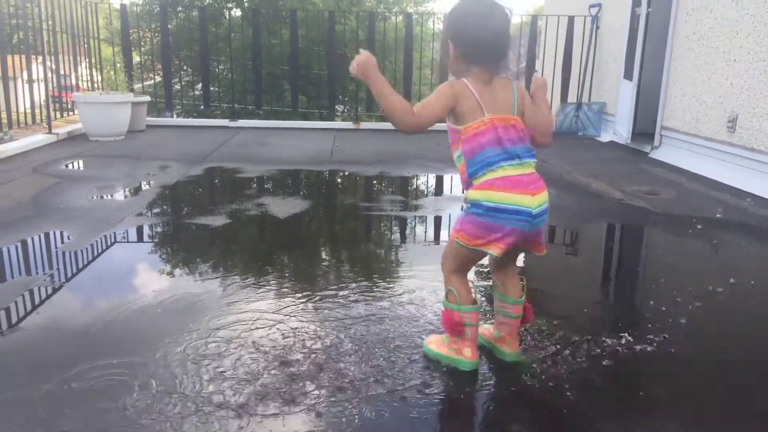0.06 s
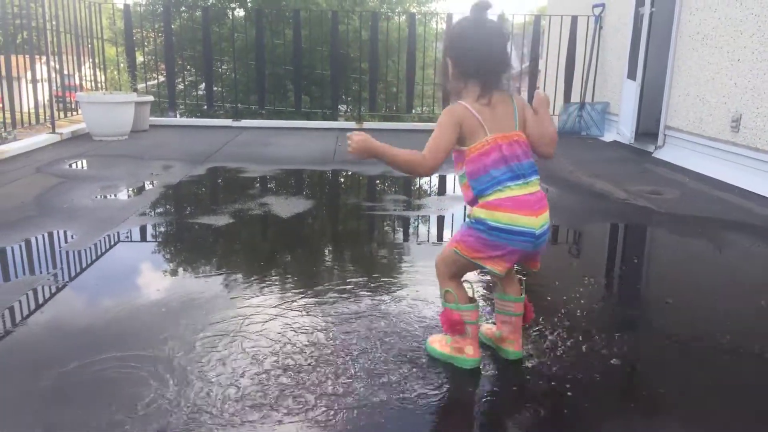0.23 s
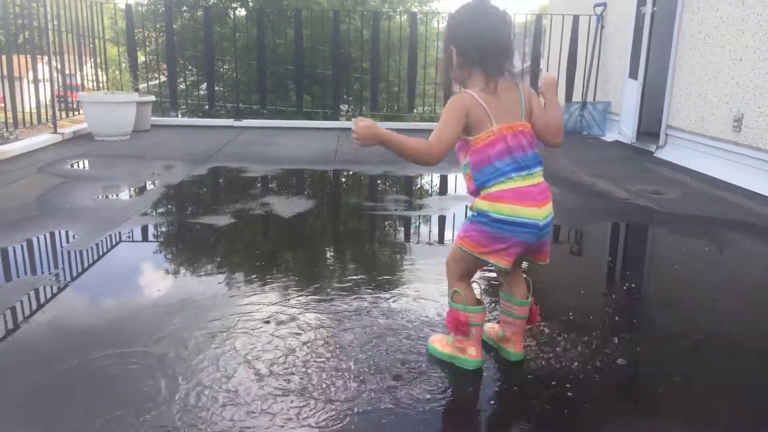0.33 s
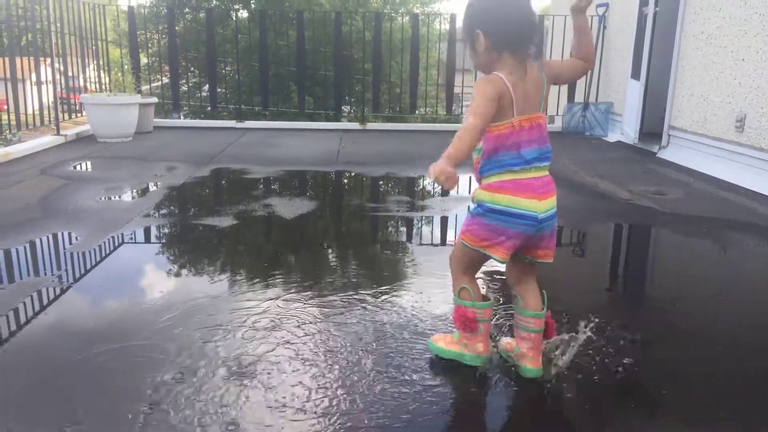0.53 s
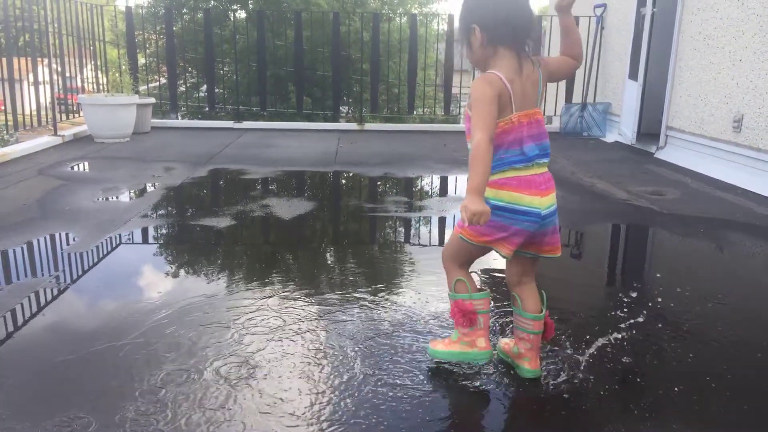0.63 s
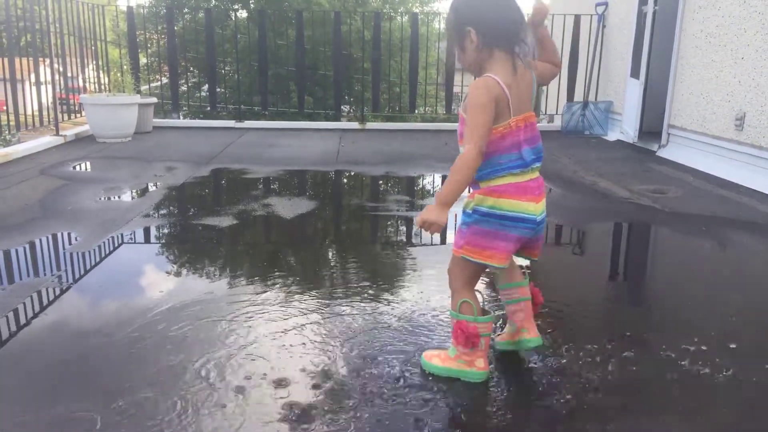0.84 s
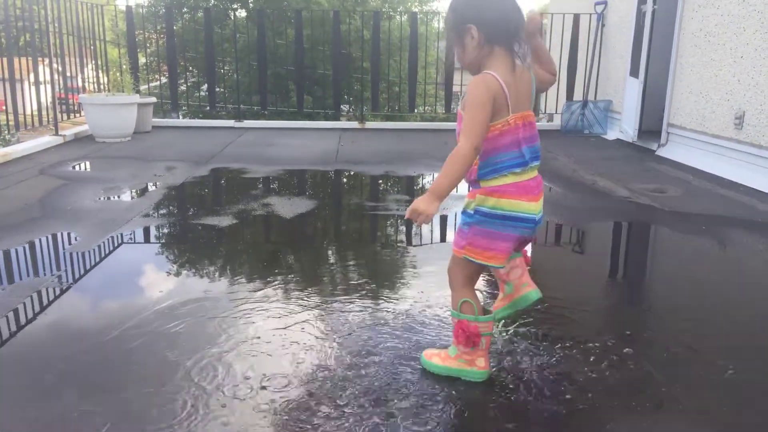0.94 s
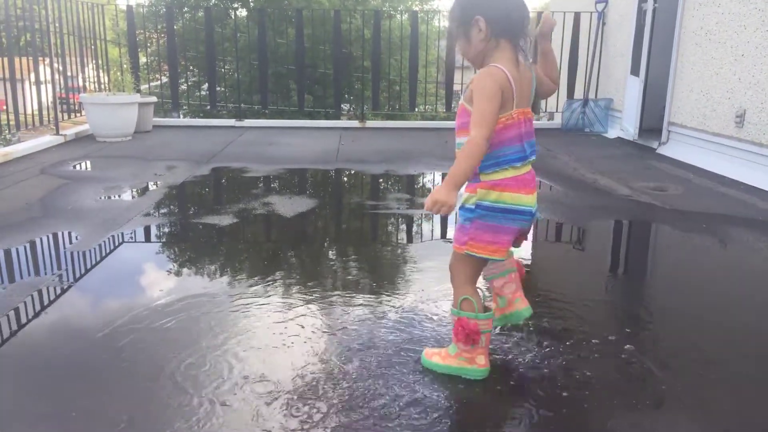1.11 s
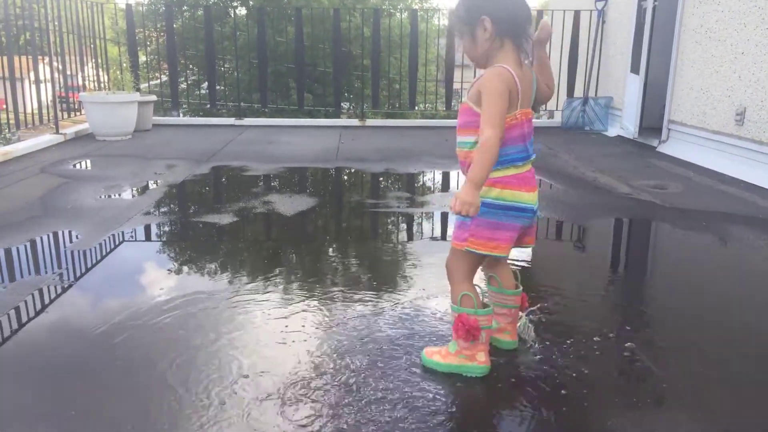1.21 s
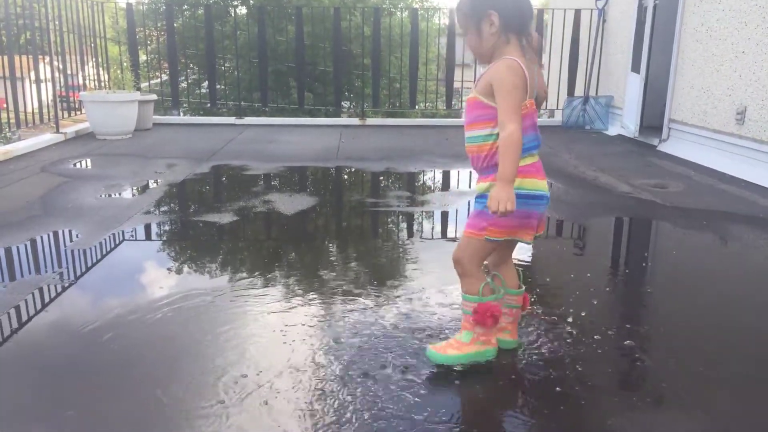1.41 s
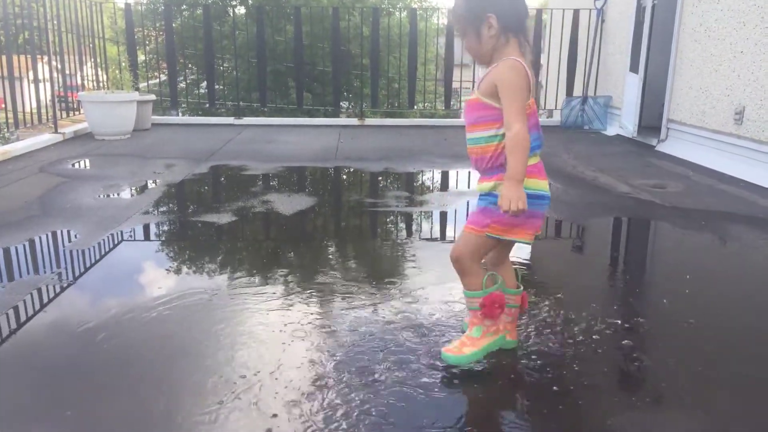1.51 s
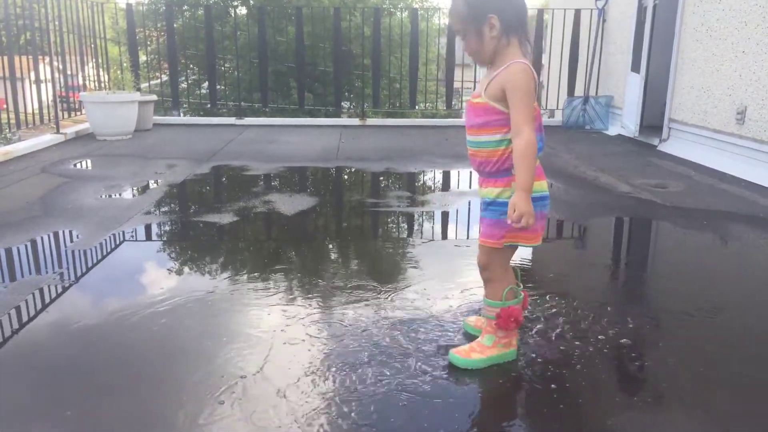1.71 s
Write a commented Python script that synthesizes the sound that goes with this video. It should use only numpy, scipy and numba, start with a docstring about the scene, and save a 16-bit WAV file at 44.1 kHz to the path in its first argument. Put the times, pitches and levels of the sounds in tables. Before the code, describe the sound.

Four puddle splashes from a child stamping in rubber boots, the first heavy and the next three softer. Each is a crisp wet slap with bubbles and falling droplets, mostly with a dull thud, over a faint outdoor rumble.

```python
"""On a roof terrace, a child in rubber boots stamps four times in a shallow puddle.
Each sole bursts the water film with a crack and squeezes out a cloud of tiny ringing bubbles;
spray hisses down after it and a house wall returns a weak echo. The heel lands with a hollow thud
and the deck booms in its low modes, over a faint outdoor rumble.
An automatic gain control lowers the level after a loud stamp."""
import sys
import numpy as np
from scipy import signal
from scipy.fft import rfft, irfft, next_fast_len
from scipy.io import wavfile
from scipy.ndimage import uniform_filter1d
from numba import njit

SR = 44100
rng = np.random.default_rng(int(sys.argv[2]) if len(sys.argv) > 2 else 0)


def pcm_store(signal):
    """Save signal as 16-bit PCM."""
    levels = np.round(np.clip(np.atleast_2d(signal), -1, 1) * 32767)
    wavfile.write(sys.argv[1], SR, levels.astype(np.int16).T)


N = 77175
T = np.arange(N) / SR
LN_1000 = np.log(1000)  # exponent of a 60 dB decay


def undb(db):
    """Amplitude ratio of a level in decibels."""
    return 10 ** (np.asarray(db) / 20)


def unit(x):
    """Normalisation to rms 1."""
    return x / np.sqrt(np.mean(x ** 2) + 1e-20)


def cut(x, hz, kind, order):
    """Maximally flat low-pass or high-pass filter."""
    return signal.sosfilt(signal.butter(order, hz, kind, fs=SR, output="sos"), x)


def colour(x, points):
    """Minimum-phase filter through (frequency [Hz], level [dB]) points; the result has rms 1."""
    hz, db = np.array(points, float).T
    size = 2 * next_fast_len(N)
    bin_hz = np.maximum(np.arange(size // 2 + 1) * SR / size, 1)
    gain = undb(np.interp(np.log(bin_hz), np.log(hz), db))
    cepstrum = irfft(np.log(gain))
    cepstrum[1:size // 2] *= 2  # folding onto positive time makes the filter causal
    cepstrum[size // 2 + 1:] = 0
    return unit(irfft(rfft(x, size) * np.exp(rfft(cepstrum)))[:N])


def swell(at, rise_s, fall_s):
    """Transient envelope: a bell-shaped rise to a peak of 1, then exponential decay."""
    envelope = np.zeros(N)
    span = slice(*np.searchsorted(T, [at - 4 * rise_s, at + 10 * fall_s]))
    t = T[span] - at
    envelope[span] = np.exp(np.where(t < 0, -(t / rise_s) ** 2, -t / fall_s))
    return envelope


def resonate(x, modes):
    """Forced response of damped modes; broadband input keeps its level."""
    t = T[:4096]
    ring = sum(undb(db) * width * np.exp(-np.pi * width * t) * np.cos(2 * np.pi * hz * t)
               for hz, width, db in modes)
    return signal.fftconvolve(x, ring / np.sqrt(np.sum(ring ** 2)))[:N]


def bubbles(times, amplitudes, hz, cycles, rise_cycles=.71, glide=.05):
    """Bubble resonance: each starts softly and decays 60 dB over `cycles` as its pitch glides up."""
    steps = np.arange(int(cycles / hz.min() * SR))
    periods = hz[:, None] * steps / SR
    envelope = (1 - np.exp(-periods / rise_cycles)) * np.exp(-LN_1000 * periods / cycles)
    phase = 2 * np.pi * periods * (1 + glide * np.minimum(periods / cycles, 1))
    rings = amplitudes[:, None] * envelope * np.sin(phase)
    starts = (np.maximum(times, 0) * SR).astype(int)
    return np.bincount((starts[:, None] + steps).ravel(), rings.ravel(), N)[:N]


# Spectrum of the outdoor air (frequency [Hz], relative level [dB])
RUMBLE_SPECTRUM = [(15, -56.5), (25, -20.5), (70, -1), (153, -7), (175, -12), (236, -10), (363, -14.5),
                   (416, -16), (489, -18), (962, -19.5), (2550, -31.5), (7310, -39.5), (16000, -47)]
def outdoor_rumble(level_db=-57.5):
    """Ambient noise: steady and random, with its power concentrated at low frequencies."""
    return undb(level_db) * colour(rng.standard_normal(N), RUMBLE_SPECTRUM)


def wall_echo(x, level_db=-24, t60_s=.28):
    """Diffuse reflection: the house wall returns a weak tail that decays exponentially."""
    tail = rng.standard_normal(N) * np.exp(-LN_1000 * T / t60_s)
    return undb(level_db) * signal.fftconvolve(x, tail / np.sqrt(np.sum(tail ** 2)))[:N]


# Single bubbles, from plops under the boot to plinks of drops (time [s], level [dB], frequency [Hz])
SINGLE_BUBBLES = [(0.2135, -37.5, 3460), (0.2258, -35, 1270), (0.2305, -24.5, 468), (0.2305, -24.5, 602),
                  (0.653, -31.5, 1504), (0.6590, -63, 457), (0.851, -43, 2780), (0.8699, -35, 1720),
                  (0.8840, -35.5, 757), (0.888, -35, 1334), (0.889, -29, 1626), (0.9938, -52.5, 3560),
                  (1.0148, -52, 2580), (1.3420, -35.5, 645), (1.3450, -43.5, 367), (1.3440, -46, 747),
                  (1.3472, -33.5, 1282), (1.461, -57, 4100)]
def drops(cycles=33, patter_per_s=17, patter_db=-68, patter_hz=4260):
    """Free oscillation of trapped air: a few clear plops and plinks over a faint random patter."""
    at, db, hz = np.array(SINGLE_BUBBLES).T
    when, strength, pitch = rng.random((int(patter_per_s * T[-1]), 3)).T
    amplitudes = undb(patter_db + 3.2 * strength)
    pitches_hz = patter_hz * 2 ** (2 * pitch - 1)  # within an octave either way
    patter = bubbles(when * T[-1], amplitudes, pitches_hz, cycles)
    return bubbles(at, undb(db), hz, cycles) + patter


# Spectrum of fine spray (frequency [Hz], relative level [dB])
SPRAY_SPECTRUM = [(400, -24.5), (1000, -15), (1400, 0.5), (2600, -3.5), (3600, -2), (4900, 0), (5800, -4),
                  (8000, -9), (11000, -15.5), (16000, -18)]
# Showers of spray, the first already fading at time zero (time [s], level [dB], 60 dB decay time [s])
SHOWERS = [(-0.07, -37.5, .18), (0.23, -34, 0.16), (0.659, -39.5, .155), (0.88, -38.5, 0.14),
           (1.348, -40, 0.14)]
def spray(rise_s=.0055, grain_db=2.5, ticks_per_s=140, tick_db=-6, tick_spread_db=2.5):
    """Superposition of random impacts: fine droplets hiss and larger ones tick after each stamp."""
    envelope = sum(undb(db) * swell(at, rise_s, t60 / LN_1000) for at, db, t60 in SHOWERS)
    impacts = (rng.random(N) < ticks_per_s / SR) * undb(tick_spread_db * rng.uniform(-1, 1, N))
    ticks = uniform_filter1d(impacts, size=30) * rng.standard_normal(N)
    hiss = rng.standard_normal(N) * undb(grain_db * np.minimum(rng.exponential(size=N), 4))
    return envelope * colour(unit(hiss) + undb(tick_db) * unit(ticks), SPRAY_SPECTRUM)


# Modes of the roof deck (frequency [Hz], relative level [dB], 60 dB decay time [s])
DECK_MODES = [(63.47, -2.5, .3), (75.6, -9.5, .26), (90.5, -17.5, 0.29), (105.9, -3, .2), (123, -6, 0.12),
              (170, -17, 0.18)]
# Footfalls on the deck (time [s], level [dB], extra gain of the upper modes [dB])
FOOTFALLS = [(-0.06, -26, -3), (0.238, -14.5, 1), (0.667, -36, 2), (1.357, -30.5, 5.5)]
def deck_booms(rise_s=.004, upper_above_hz=90):
    """Modal vibration: the child's weight rings the deck; where she lands sets the mode balance."""
    booms = np.zeros(N)
    for at, db, upper_db in FOOTFALLS:
        t = np.maximum(T - at, 0)
        for hz, mode_db, t60 in DECK_MODES:
            gain = undb(db + mode_db + upper_db * (hz > upper_above_hz))
            envelope = (1 - np.exp(-t / rise_s)) * np.exp(-LN_1000 * t / t60)
            booms += gain * envelope * np.sin(2 * np.pi * hz * t)
    return booms


# Resonances of the hollow boot and sole (frequency [Hz], bandwidth [Hz], relative level [dB])
BOOT_MODES = [(144.8, 40, -3), (190, 70, -2.5), (250.7, 110, 3.5), (356, 42, 0), (439, 68, -10.5),
              (596, 44, -3.5), (770, 90, -14)]
# Heel landings (time [s], level [dB], decay time constant [ms])
HEEL_LANDINGS = [(0.229, -14.5, 11), (0.661, -35.5, 11.4), (0.88, -43.5, 17), (1.343, -33.5, 17.2)]
def heel_thuds(rise_s=.001, top_hz=694):
    """Impact excitation: a brief rough push, softened by the rubber, rings the hollow boot."""
    envelope = sum(undb(db) * swell(at, rise_s, fall_ms / 1000) for at, db, fall_ms in HEEL_LANDINGS)
    push = envelope * rng.standard_normal(N)
    return cut(resonate(push, BOOT_MODES), top_hz, "lowpass", order=4)


# Breaks in the water film (time [s], level [dB])
FILM_BREAKS = [(0.226, -18), (0.638, -45), (0.6488, -35), (0.6830, -42), (0.8921, -40), (1.3481, -34)]
def film_snaps(fall_s=.00094, low_hz=5030):
    """Film rupture: each break in the water radiates a thin, very short burst of noise."""
    envelope = sum(undb(db) * swell(at, fall_s / 2, fall_s) for at, db in FILM_BREAKS)
    hiss = colour(rng.standard_normal(N), SPRAY_SPECTRUM)
    return envelope * unit(cut(hiss, low_hz, "highpass", order=2))


def sputter(depth_db=8, hold_samples=44):
    """Amplitude modulation: water tears unevenly, so the gain jumps about once a millisecond."""
    steps = np.repeat(rng.uniform(-1, 1, N // hold_samples + 1), hold_samples)[:N]
    return unit(undb(depth_db * uniform_filter1d(steps, size=12)))


def bubble_cloud(at, hz, count=150, per_s=3000, spread=.13, cycles=24):
    """Incoherent sum: bubbles of similar pitch ring around time `at`, with an rms near 1."""
    span_s = count / per_s
    offsets_s = ((np.arange(count) + rng.random(count)) / count - .5) * span_s
    pitches_hz = hz * np.exp(spread * rng.uniform(-1.96, 1.63, count))
    cloud = bubbles(at + offsets_s, rng.choice([-1, 1], count), pitches_hz, cycles)
    return cloud / np.sqrt(np.sum(cloud ** 2) / (span_s * SR))


# Spectrum of the crack of slapped water (frequency [Hz], relative level [dB])
CRACK_SPECTRUM = [(300, -13.5), (900, -5.5), (1350, 6.5), (1950, -8), (2700, 2.5), (4000, -2.5),
                  (4850, -12), (5500, -2), (7200, 1), (9000, -2.5), (10500, -9.5), (11500, -7), (12400, -7),
                  (16000, -21)]
# Resonances of air and water under the tread (frequency [Hz], bandwidth [Hz], relative level [dB])
TREAD_MODES = [(2616, 100, 1.5), (3052, 79, -2), (3647, 43, -8.5), (3886, 110, -9.5), (5352, 240, -2),
               (6430, 160, -4), (7500, 140, -8.5), (11450, 300, -1.5)]
# Contacts of sole and water (peak time [s], relative crack level [dB], rise [ms], fall [ms],
# cloud level [dB], bubble frequency [Hz], lower crack cutoff [Hz], upper crack cutoff [Hz])
SOLE_CONTACTS = [(0.223, -22, 2.2, 2.5, -28, 2770, 1360, 7860),
                 (0.226, -15.5, 3.1, 1.6, -22, 2688, 2050, 16300),
                 (0.2341, -26, 2.3, 15.4, -32, 3000, 1580, 7980),
                 (0.6287, -38, 3.9, 3.2, -37, 3360, 2700, 10800),
                 (0.644, -41, 11, 23, -45, 2760, 2400, 15970),
                 (0.6548, -27, 2.3, 5.6, -33, 4570, 480, 16000),
                 (0.6665, -32, 1.4, 1.7, -55, 3030, 1200, 11700),
                 (0.8735, -26, 4.9, 2, -25.5, 3160, 1450, 13900),
                 (0.881, -39.5, 8.9, 2.8, -38.5, 2770, 1300, 13760),
                 (0.8895, -32, 3.1, 4.2, -35.5, 2840, 666, 14100),
                 (1.3391, -36.5, 7.7, 2.6, -42.5, 2760, 600, 10900),
                 (1.3470, -36, 5.3, 8.8, -42, 4640, 606, 15000)]
def sole_slaps(direct_db=-5.5, tread_db=-14.5):
    """Impact and air entrainment: the film cracks, ringing the tread, and bubbles are squeezed out."""
    tearing = colour(rng.standard_normal(N) * sputter(), CRACK_SPECTRUM)
    cracks, clouds = np.zeros(N), np.zeros(N)
    for at, crack_db, rise_ms, fall_ms, cloud_db, hz, low_hz, high_hz in SOLE_CONTACTS:
        envelope = swell(at, rise_ms / 1000, fall_ms / 1000)
        crack = cut(tearing, low_hz, "highpass", order=4)
        crack = cut(crack, high_hz, "lowpass", order=2)
        cracks += undb(crack_db) * envelope * crack
        clouds += undb(cloud_db) * envelope * bubble_cloud(at, hz)
    return undb(direct_db) * cracks + undb(tread_db) * resonate(cracks, TREAD_MODES) + clouds


# Cancelled bands of the splashes (frequency [Hz], bandwidth [Hz], amplitude share removed [0-1])
CANCELLED_BANDS = [(1145, 210, 1), (2118, 270, .7), (3288, 130, 0.7), (4870, 380, 1)]
def interference(x):
    """Destructive interference: a few narrow bands cancel between puddle and microphone."""
    for hz, width, share in CANCELLED_BANDS:
        band = signal.lfilter(*signal.iirpeak(hz, hz / width, fs=SR), x)
        x = x - share * band
    return x


def scene():
    """Linear superposition: water, its echo, outdoor air, boot and deck add in one channel."""
    water = interference(sole_slaps() + film_snaps() + spray()) + drops()
    return (water + wall_echo(water) + outdoor_rumble() + heel_thuds() + deck_booms())[None]


@njit
def follow(x, attack_s, release_s):
    """Envelope detection: the rectified signal is smoothed with separate rise and fall times."""
    envelope, level = np.empty(len(x)), 0.
    for i in range(len(x)):
        lag_s = attack_s if abs(x[i]) > level else release_s
        level += (abs(x[i]) - level) / (lag_s * SR)
        envelope[i] = level
    return envelope


def record(dry, knee_db=-29, slope=.32, top_hz=16000):
    """Automatic gain control: gain drops on a loud stamp and recovers slowly; a low-pass follows."""
    level = follow(dry[0], attack_s=.0031, release_s=.24)
    gain = np.maximum(level / undb(knee_db), 1) ** -slope
    lowpass = signal.ellip(8, .2, 80, top_hz, fs=SR, output="sos")
    return signal.sosfilt(lowpass, dry * gain)


dry = scene()
out = record(dry)
pcm_store(out)
```